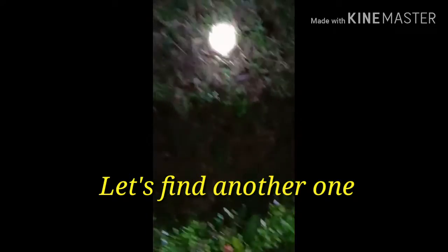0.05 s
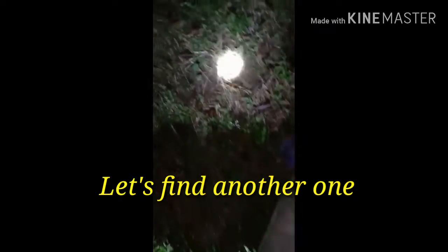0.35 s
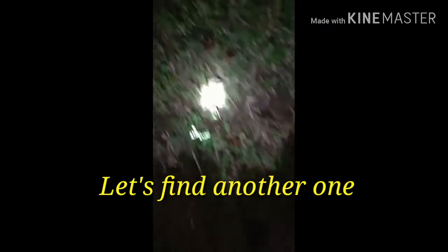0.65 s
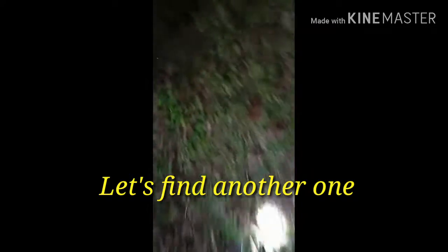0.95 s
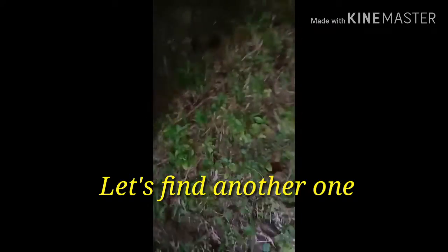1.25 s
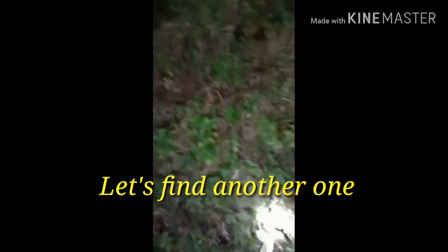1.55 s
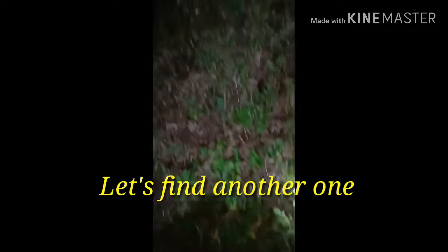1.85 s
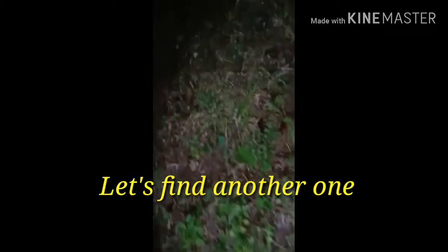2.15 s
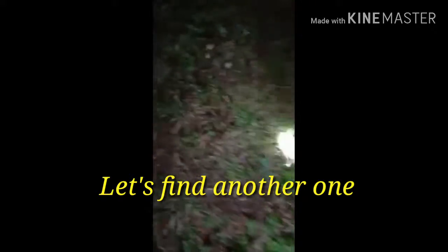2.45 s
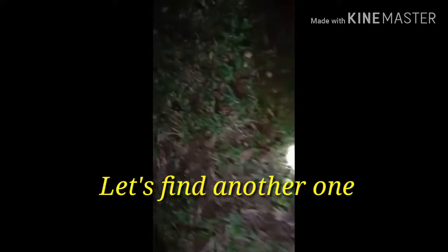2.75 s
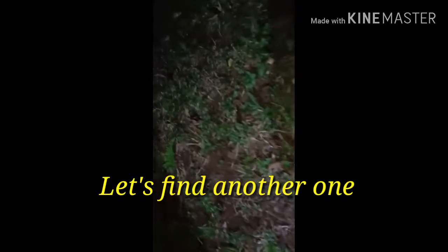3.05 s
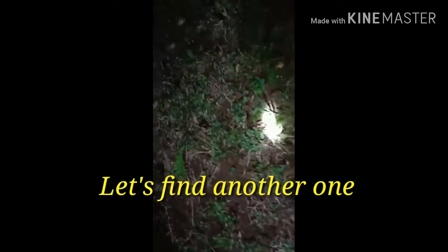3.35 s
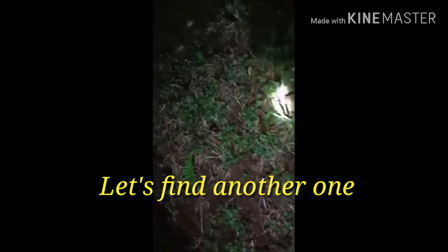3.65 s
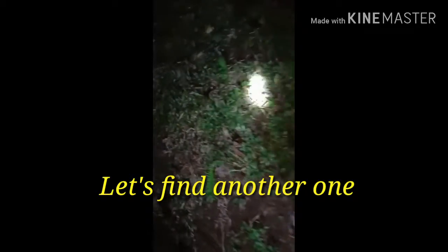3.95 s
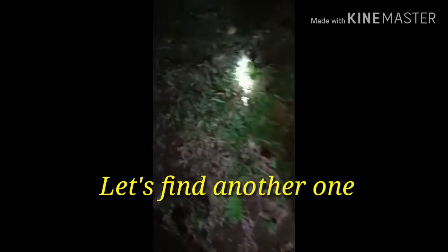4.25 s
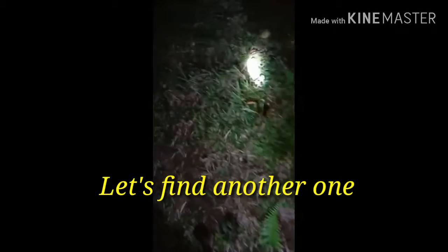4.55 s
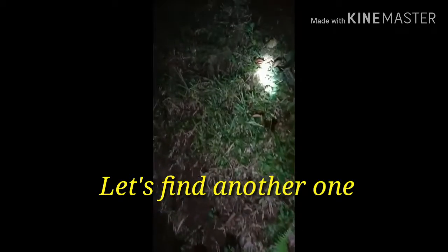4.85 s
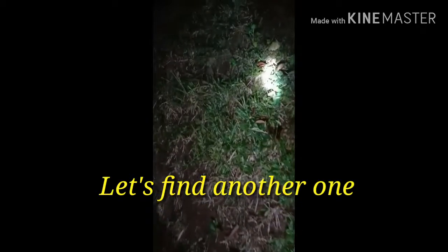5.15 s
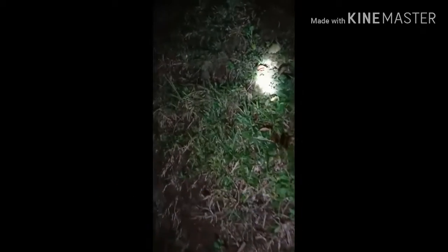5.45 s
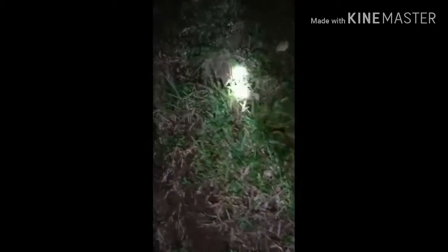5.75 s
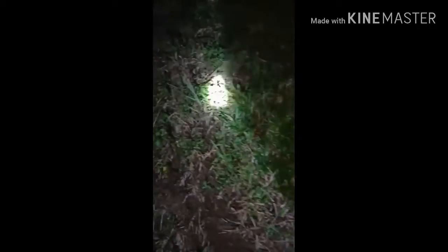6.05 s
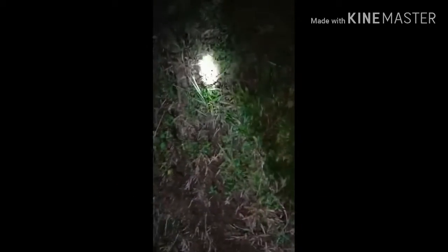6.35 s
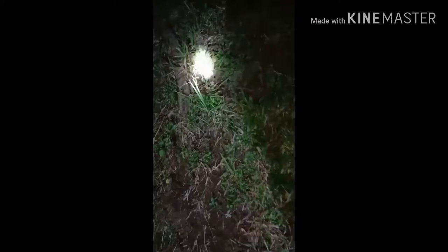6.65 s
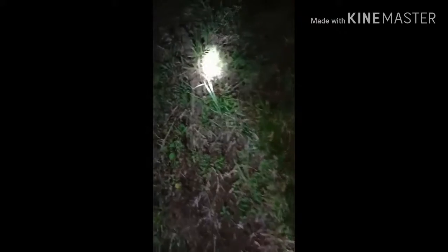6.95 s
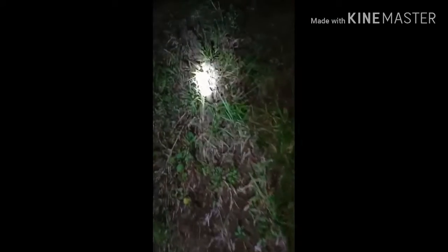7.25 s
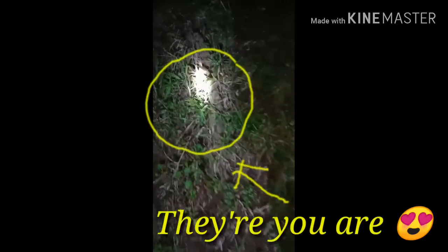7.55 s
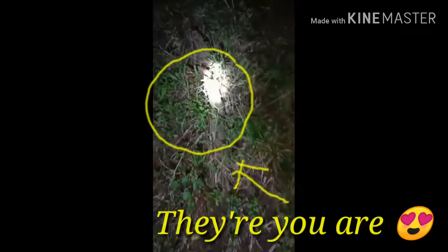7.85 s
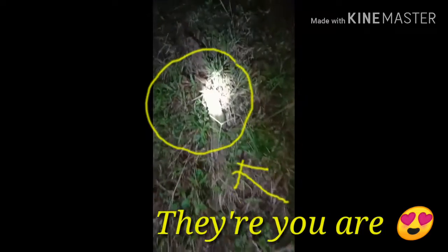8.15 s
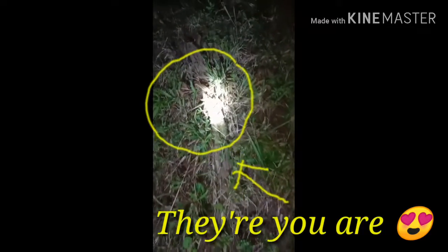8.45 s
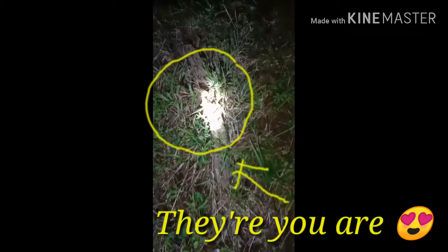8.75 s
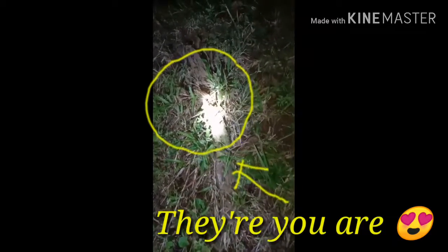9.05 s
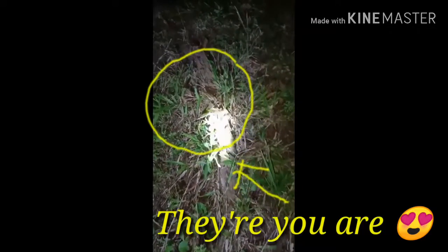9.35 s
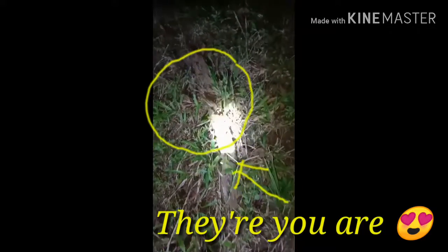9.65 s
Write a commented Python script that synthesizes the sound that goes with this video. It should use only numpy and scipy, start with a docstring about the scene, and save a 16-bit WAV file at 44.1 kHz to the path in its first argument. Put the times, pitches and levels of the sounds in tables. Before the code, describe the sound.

Over a steady far insect chorus, a close katydid's high pulsing trill runs on, breaks off, and returns in two rough bursts.

```python
"""Night in the grass: far insects sing on while a phone is carried slowly towards a trilling katydid.
Each wingbeat drags a scraper along a toothed file; the strikes ring the wing and scatter in the grass.
Around 1 s the wing comes to face the phone and plants rustle; just after 2 s a step thuds.
Faint, short tones come and go far off, perhaps a dog. From about 6 s the phone closes in.
At 8.2 s the even trill stops, then the song resumes in two faster, raspier bursts."""
import sys
import numpy as np
from scipy import signal
from scipy.fft import rfft, irfft, next_fast_len
from scipy.io import wavfile
from scipy.ndimage import uniform_filter1d, minimum_filter1d

SR = 44100
rng = np.random.default_rng(int(sys.argv[2]) if len(sys.argv) > 2 else 0)


def wrap_up_sound(samples):
    """Save the sound to the file named by the first command line argument, as 16-bit audio."""
    columns = np.atleast_2d(samples).T
    # keep every value between -1 and 1, then stretch to whole-number steps
    tamed = np.clip(columns, -1, 1)
    steps = np.round(tamed * 32767).astype(np.int16)
    wavfile.write(sys.argv[1], SR, steps)


N = 432621
TIME = np.arange(N) / SR


def undb(db):
    """Decibels to gain."""
    return 10 ** (np.asarray(db) / 20)


def unit(x):
    """Scale to rms 1."""
    return x / np.sqrt(np.mean(x ** 2) + 1e-18)


def curves(table, at):
    """Read a table as automation: straight lines between breakpoints along its first column."""
    key, *columns = np.transpose(table)
    return [np.interp(at, np.sort(key), column) for column in columns]


def spectral(x, gain):
    """Filter by a gain given as a function of frequency."""
    size = next_fast_len(len(x) + 4096)
    hz = np.arange(size // 2 + 1) * SR / size + 1
    return irfft(rfft(x, size) * gain(hz), size)[:len(x)]


def equalise(x, points):
    """Apply an EQ curve of (frequency [Hz], gain [dB]) points."""
    hz, db = np.transpose(points)
    return spectral(x, lambda f: undb(np.interp(np.log(f), np.log(hz), db)))


def lowpass(x, hz):
    """Keep the part of a sound under a steep cutoff."""
    return spectral(x, lambda f: 1 / (1 + (f / hz) ** 20))


def band_noise(hz, width_hz, size=N):
    """Noise in a steep-sided resonance, rms 1."""
    noise = rng.standard_normal(size)
    return unit(spectral(noise, lambda f: 1 / (1 + ((f * f - hz * hz) / (f * width_hz)) ** 4)))


def wobble(rate_hz):
    """A smooth random modulator, rms 1."""
    hold = int(SR / rate_hz)
    points = rng.standard_normal(N // hold + 2)
    ramps = np.interp(np.arange(N) / hold, np.arange(len(points)), points)
    return unit(uniform_filter1d(ramps, hold))


# Tone of the bed, far insects and night air: (frequency [Hz], relative level [dB])
CHORUS_EQ = [(30, -46), (60, -28), (110, -26.5), (250, -33.5), (500, -38), (1500, -38.5), (4300, -38.5),
             (4900, -9.5), (5600, -11.5), (6200, -0.5), (7200, 3), (8500, -12), (10500, -19), (15500, -26)]

def far_chorus():
    """Far insects blend into a smooth, high bed over a faint rumble."""
    bed = unit(equalise(rng.standard_normal(N), CHORUS_EQ))
    return bed * undb(-33 + 0.69 * wobble(rate_hz=30))


# Cricket cues: (start [s], end [s], level [dB])
CRICKET_PHRASES = [(.5, 2.55, -54), (3.45, 4.3, -54), (5.03, 5.5, -56), (8.21, 8.33, -56),
                   (9.29, 9.58, -49.5)]

def cricket(fade_s=0.028, floor_db=-60.5):
    """One low, wavering cricket in the distance, chirring faintly between its phrases."""
    phrases = sum(undb(db) * np.clip(np.minimum(TIME - start, end - TIME) / fade_s + .5, 0, 1)
                  for start, end, db in CRICKET_PHRASES)
    envelope = np.maximum(phrases, undb(floor_db))
    return band_noise(hz=1954, width_hz=105) * envelope * undb(wobble(rate_hz=27))


def stirrings(count, level_db=-74.5, spread_db=3.5, centre_hz=900, half_length_s=0.063):
    """Random rustle cues for grass stirring faintly underfoot."""
    times = (np.arange(count) + rng.random(count)) * TIME[-1] / count
    strong, high, long = rng.standard_normal((count, 3)).T
    hz = centre_hz * np.exp(0.32 * high)
    return list(zip(times, level_db + spread_db * strong, hz, 0.34 * hz, half_length_s * np.exp(.5 * long)))


# Cues for rustles (wide bands) and far-off tones (narrow bands):
# (peak time [s], level [dB], centre [Hz], width [Hz], half-length [s])
RUSTLE_AND_TONE_CUES = [(0.837, -63, 1240, 1200, .15), (1.011, -47.5, 1440, 1380, .12),
                        (1.049, -48.5, 3300, 1800, 0.2), (1.09, -69, 350, 400, 0.61),
                        (1.12, -53, 630, 453, 0.076), (1.18, -54, 1310, 1900, 0.43),
                        (1.328, -57.5, 900, 600, .11), (1.577, -59.5, 957, 70, 0.082),
                        (1.92, -49.5, 1170, 1000, 0.028), (2.295, -62, 1300, 700, 0.14),
                        (4.689, -64, 595, 300, 0.085), (6.447, -65, 810, 200, .05),
                        (6.792, -73, 800, 200, .18), (7.457, -62, 1230, 400, 0.067),
                        (7.926, -54, 900, 700, 0.018), (9.29, -62.5, 514, 120, .027)]

def rustles_and_far_tones():
    """Rustling plants, and a few faint, short, far-off tones, perhaps a dog: swells of band noise."""
    out = np.zeros(N)
    flutter = unit(undb(2.8 * wobble(rate_hz=200)))
    for peak_s, db, hz, width_hz, half_length_s in RUSTLE_AND_TONE_CUES + stirrings(count=16):
        start = int(max(peak_s - .5, 0) * SR)
        span = slice(start, min(start + SR, N))
        swell = np.exp(-2 * ((TIME[span] - peak_s) / half_length_s) ** 2)
        band = band_noise(hz, width_hz, size=SR)[:len(swell)]
        out[span] += undb(db) * swell * flutter[span] * band
    return out


def footstep(at_s=2.1452, level_db=-29.5, start_hz=183.53, attack_s=0.007, sag_s=0.034):
    """A soft thud whose pitch sags as the soil gives."""
    t = np.maximum(TIME - at_s, 0)
    rise = t / attack_s
    phase = 2 * np.pi * start_hz * sag_s * (1 - np.exp(-t / sag_s))
    return undb(level_db) * rise * np.exp(1 - rise) * np.sin(phase)


def grass(x, near_db, near_t60, far_db, far_t60, spots=12):
    """Nearby blades scatter the song and the garden adds a faint tail; the paths change along the walk."""
    t = np.arange(SR // 4) / SR
    decays = undb(-60 * t / np.array([[near_t60], [far_t60]]))
    out = np.pad(x, (0, len(t)))
    for spot_s in np.linspace(0, TIME[-1], spots):
        near, far = rng.standard_normal((2, len(t))) * decays
        paths = undb(near_db) * near / np.linalg.norm(near) + undb(far_db) * far / np.linalg.norm(far)
        crossfade = 1 - np.abs(TIME - spot_s) * (spots - 1) / TIME[-1]
        here = np.flatnonzero(crossfade > 0)
        echo = signal.fftconvolve(x[here] * np.sqrt(crossfade[here]), paths)
        out[here[0]:here[0] + len(echo)] += echo
    return out[:N]


def wingbeats(start, end, period_s, slowing_s, settled_s=np.inf):
    """Times and periods of a run of wingbeats, each slower than the last until the tempo settles."""
    periods = np.minimum(period_s + slowing_s * np.arange(int((end - start) / period_s) + 1), settled_s)
    beats = start + np.cumsum(periods) - periods
    return beats[beats < end], periods[beats < end]


def scrape(beats, beats_db, stroke, speed_spread, time_scale=1, waver_depth=.06, roughness=7):
    """Tooth strikes on the file: the scraper's speed sets their rate; it skips where it runs unevenly."""
    max_teeth, oversample = 300, 8
    ms = np.linspace(stroke[0][0], stroke[-1][0], 1000)
    teeth_passed = np.cumsum(curves(stroke, ms)[0]) * (ms[1] - ms[0]) / 1000
    tooth_ms = np.interp(np.arange(min(int(teeth_passed[-1]), max_teeth)), teeth_passed, ms)
    hz, force_db, uneven = curves(stroke, tooth_ms)
    slip, catch, grip, drag = rng.standard_normal((4, len(beats), max_teeth))[:, :, :len(hz)]
    stretch = time_scale + speed_spread * rng.standard_normal((len(beats), 1))
    # the scraper's speed wavers within a stroke, so no two chirps bend alike
    waver = np.cumsum(waver_depth * uniform_filter1d(drag, size=7, axis=1) / hz, axis=1)
    strike_s = beats[:, None] + stretch * tooth_ms / 1000 + waver + uneven * slip / hz
    # single teeth catch harder or softer, and the grip comes and goes over runs of teeth
    grit = catch + 4 * uniform_filter1d(grip, size=9, axis=1)
    force = undb(beats_db[:, None] + force_db + roughness * np.sqrt(np.abs(uneven)) * grit)
    # strikes fall between samples, so they are laid on a finer grid
    slots = np.abs(strike_s.ravel() * SR * oversample).astype(int)
    clicks = np.bincount(slots, force.ravel(), N * oversample)[:N * oversample]
    return signal.resample_poly(clicks, 1, oversample)


# Opening and closing strokes of a raspy wingbeat, at the settled tempo:
# (time from the beat [ms], tooth rate [Hz], relative force [dB], unevenness [0-1])
BURST_OPEN = [(-33, 2600, -16.5, 0.26), (-28, 2900, -6.5, 0.24), (-23, 3200, -5.5, .25),
              (-18, 6500, -11.5, 0.14)]
BURST_CLOSE = [(-14, 3300, -2, 0.21), (-9, 3200, 0, .2), (-3.5, 5700, -6, 0.13), (-1.5, 6500, -3.5, 0.13),
               (0, 7880, .5, .055), (2.5, 8400, -18, 0.12)]
# Wing resonance in the bursts: (frequency [Hz], relative gain [dB])
BURST_EQ = [(1000, -58), (1400, -53), (1750, -23.5), (2600, -28), (3400, -19), (4200, -32.5), (5200, -12.5),
            (6300, -2), (7800, -1.5), (9000, -10.5), (10500, -17.5), (13300, -25.5), (15200, -20.5)]
# Burst cues: (first beat [s], end [s], first period [s], level [dB])
BURST_CUES = [(8.3677, 9.24, .032, -19.1), (9.3672, 9.82, .0382, -18.2)]

def katydid_bursts(settled_s=.0405, scatter_db=0.9, lead_periods=.66):
    """Faster, rougher wingbeats, each ending in an upward flick that meets the wing's resonance."""
    out = np.zeros(N)
    for start, end, period_s, db in BURST_CUES:
        beats, periods = wingbeats(start, end, period_s, slowing_s=.0005, settled_s=settled_s)
        time_scale = periods[:, None] / settled_s  # a hurried start, with shorter strokes
        beats_db = np.linspace(0.1, 0, len(beats)) + scatter_db * rng.standard_normal(len(beats))
        strikes = scrape(beats, beats_db, BURST_OPEN + BURST_CLOSE, 0.0204, time_scale)
        strikes *= TIME > start - lead_periods * period_s  # the wings start half open
        wing = equalise(strikes, BURST_EQ)
        song = grass(wing, near_db=-0.5, near_t60=0.018, far_db=-10.5, far_t60=0.051, spots=24)
        burst_rms = np.sqrt(np.mean(song[(TIME > start) & (TIME < end)] ** 2))
        out += undb(db) * song / burst_rms
    return out


def levelled(x, end_s):
    """Ride the gain to rms 1 over several wingbeats, freezing it shortly before the end."""
    power = uniform_filter1d(uniform_filter1d(x ** 2, SR // 3), SR // 4)
    freeze_s = end_s - 1 / 3
    return x / np.sqrt(np.where(TIME < freeze_s, power, power[int(freeze_s * SR)]) + 1e-18)


# Soft opening and loud closing strokes of a trill wingbeat:
# (time from the beat [ms], tooth rate [Hz], relative force [dB], unevenness [0-1])
TRILL_OPEN = [(-21, 2300, -17.5, 0.16), (-17, 1850, -8, .08), (-10.5, 1850, -5, .1), (-7, 6400, -15, .11)]
TRILL_CLOSE = [(-4.5, 3000, -3, 0.076), (-2, 2280, 0.5, .025), (2, 2250, 0, 0.026), (5.5, 2900, 1.5, 0.047),
               (7.5, 6800, -9.5, 0.21), (10, 5900, -8.5, 0.15), (14, 6400, -12, .11),
               (21, 6500, -24.5, 0.16)]
# Wing resonance turned aside, facing the phone and close up: (frequency [Hz], relative gain [dB])
ASIDE_EQ = [(100, -68), (1000, -32), (1700, -25), (2250, -12.5), (3300, -33.5), (4000, -25.5),
            (4800, -10.5), (5700, 3), (6900, 0.5), (8000, -4.5), (10400, -6.5), (11100, -2.5), (13000, -20),
            (15300, -8)]
FACING_EQ = [(1000, -61), (1700, -30.5), (2300, -24.5), (3100, -25.5), (4100, -30.5), (4800, -16),
             (5600, -4), (6900, 10.5), (8000, -0.5), (9400, -7.5), (10300, -12.5), (11300, -11.5),
             (13000, -25.5), (15300, -17.5)]
CLOSE_EQ = [(100, -70), (1000, -47), (1700, -26.5), (2300, -14.5), (3100, -17.5), (4200, -21),
            (4800, -20.5), (5350, 1), (6000, 0.5), (6900, 5), (8000, -2), (9400, -6.5), (10300, -15),
            (13000, -24.5), (15300, -24)]
# Band faders as the phone moves: (time [s], ring level [dB], buzz re ring [dB], sheen re ring [dB])
TRILL_FADERS = [(.25, -23.3, -22.5, -7.5), (1.1, -21.5, -21.5, -10), (1.85, -23, -21, -7),
                (2.9, -21.5, -23, -11.5), (4.9, -22.5, -19, -6.5), (5.7, -21, -22.5, -9),
                (6.35, -23.5, -18, -4.5), (7.4, -23.5, -17.5, -2.5), (8.15, -21.5, -21.5, -6)]

def katydid_trill(start_s=.0259, end_s=8.192, buzz_top_hz=4100, ring_top_hz=8100):
    """About 23 wingbeats a second; the wing beams its low buzz, ring and upper sheen differently."""
    beats, _ = wingbeats(start_s, end_s, period_s=.043357, slowing_s=5.2e-6)  # the insect tires
    beats += np.interp(beats, (end_s - .35, end_s), (0, .01))  # the last beats drag
    late, strong = rng.standard_normal((len(beats), 2)).T
    beats_db = 0.59 * strong - 5 * (beats > beats[-2])  # the last beat is weak
    strikes = scrape(beats + 0.00045 * late, beats_db, TRILL_OPEN + TRILL_CLOSE, speed_spread=.015)
    strikes *= np.clip((end_s - TIME) / 0.0037, 0, 1)  # and breaks off halfway
    facing = np.interp(TIME, (0.57, 1.4), (0, 1))  # the wing comes to face the phone
    close = np.interp(TIME, (5.74, 7.27), (0, 1))  # the phone closes in
    wing = ((1 - facing) * equalise(strikes, ASIDE_EQ)
            + (facing - close) * equalise(strikes, FACING_EQ)
            + close * equalise(strikes, CLOSE_EQ))
    # blades scatter the short waves of the ring more than the long ones of the buzz
    buzz = lowpass(grass(wing, near_db=-6.5, near_t60=0.028, far_db=-20.5, far_t60=0.02), buzz_top_hz)
    scattered = grass(wing, near_db=2, near_t60=.02, far_db=-9.5, far_t60=0.24, spots=24)
    sheen = scattered - lowpass(scattered, ring_top_hz)
    ring = scattered - sheen - lowpass(scattered, buzz_top_hz)
    # the fast run-out of the closing stroke, 10 ms after the beat, drives the buzz less
    since_beat = TIME - beats[np.maximum(np.searchsorted(beats, TIME) - 1, 0)]
    buzz *= undb(-5.5 * np.exp(-((since_beat - 0.01) / 0.004) ** 4))
    ring, buzz, sheen = (levelled(band, end_s) for band in (ring, buzz, sheen))
    ring_db, buzz_db, sheen_db = curves(TRILL_FADERS, TIME)
    return undb(ring_db) * (ring + undb(buzz_db) * buzz + undb(sheen_db) * sheen)


def scene():
    """The katydid in front of the garden's night sounds, in mono."""
    katydid = katydid_trill() + katydid_bursts()
    garden = far_chorus() + cricket() + rustles_and_far_tones() + footstep()
    return (garden + katydid)[None]


def record(dry):
    """The phone's limiter holds down the highest peaks, then the top is cut."""
    ceiling, hold, top_hz = .39, SR // 250, 15500
    gain = ceiling / np.maximum(np.abs(dry), ceiling)
    smooth_gain = uniform_filter1d(minimum_filter1d(gain, hold), hold)
    high_cut = signal.ellip(10, .2, 80, top_hz, fs=SR, output="sos")
    return signal.sosfilt(high_cut, dry * smooth_gain)


dry = scene()
out = record(dry)
wrap_up_sound(out)
```